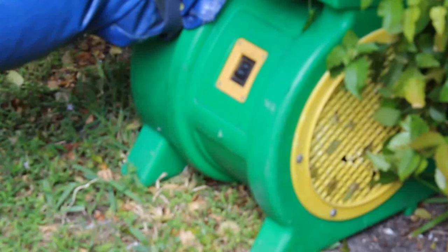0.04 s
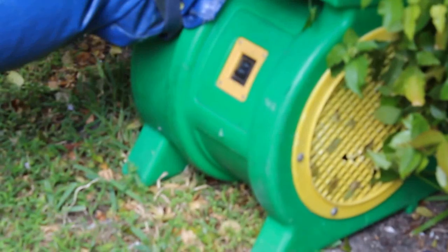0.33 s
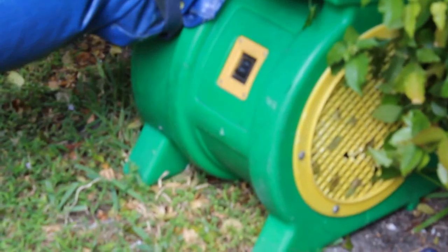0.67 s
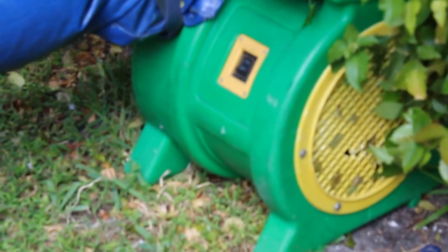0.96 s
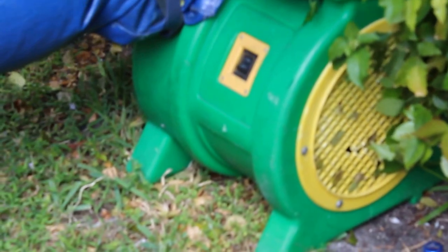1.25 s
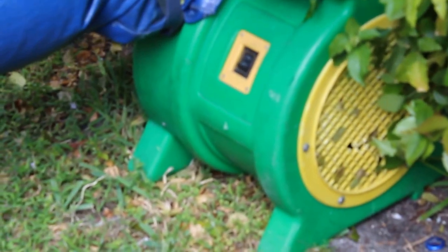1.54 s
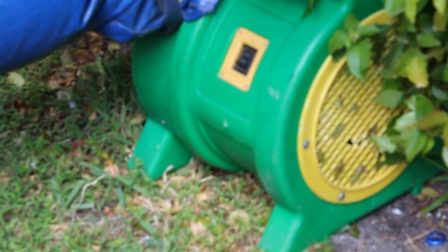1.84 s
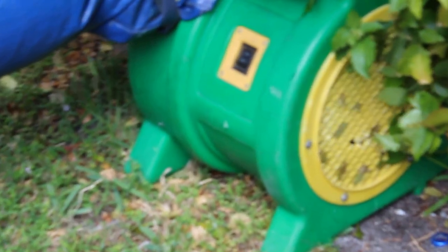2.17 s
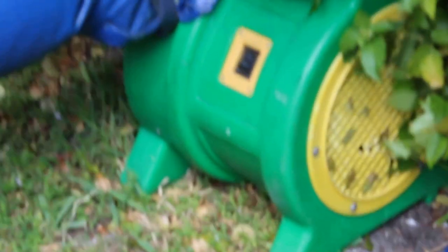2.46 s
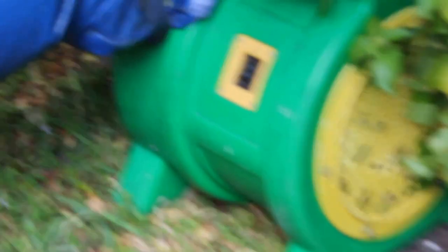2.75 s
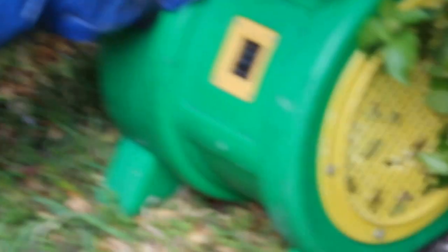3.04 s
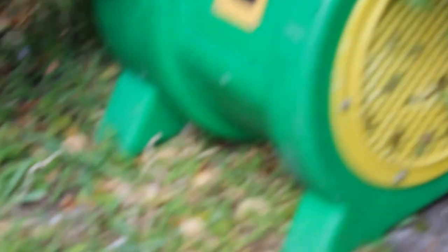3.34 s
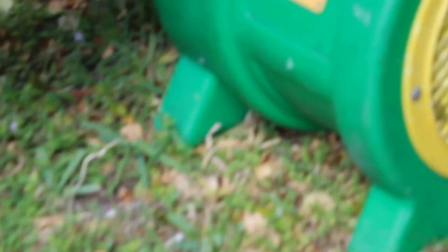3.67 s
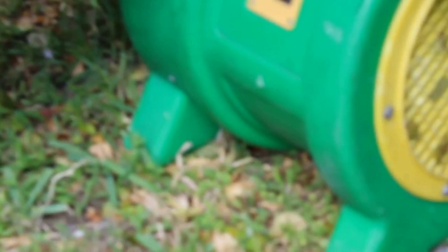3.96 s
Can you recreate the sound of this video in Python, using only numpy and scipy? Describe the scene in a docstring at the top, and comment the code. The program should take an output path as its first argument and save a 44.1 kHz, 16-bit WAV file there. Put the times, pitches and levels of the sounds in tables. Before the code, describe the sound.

An electric blower fan roars steadily up close, with a held whistling note and low hum.

```python
"""A roar of air with one steady note in it cuts in: an electric blower keeping an inflatable up,
on a lawn, close to the microphone. Air rushes through the housing and whistles at the intake grille.
The twelve-blade impeller sings the note; the motor adds a cluster of whining lines and a mains hum.
In the second half the microphone moves, and the balance of the resonances shifts."""
import sys
import numpy as np
from scipy import signal
from scipy.fft import rfft, irfft
from scipy.io import wavfile

SR = 44100
rng = np.random.default_rng(int(sys.argv[2]) if len(sys.argv) > 2 else 0)


def int16_out(signal):
    """Quantize to a 16-bit WAV file."""
    q = np.round(np.clip(np.atleast_2d(signal).T, -1, 1) * 32767)
    wavfile.write(sys.argv[1], SR, q.astype(np.int16))


N = 176400

SHAFT_HZ, BLADES = 56.45, 12
SPEED_WANDER = 0.00027   # share of the shaft speed
TURBULENCE_HZ, FLUTTER_HZ = 19, 22
MOVE_START_S, MOVE_END_S = 2.06, 3.16   # the microphone changes position


def from_db(db):
    """Decibels to gain."""
    return 10 ** (np.asarray(db) / 20)


def rms_one(x):
    """Scale to unit rms."""
    return x / np.sqrt(np.mean(x ** 2) + 1e-20)


def in_time(rows):
    """Rows of (time [s], values...) as one curve per value column, sample by sample."""
    times, *columns = np.transpose(rows)
    return [np.interp(np.arange(N) / SR, times, column) for column in columns]


def bin_hz():
    """Frequencies of the spectrum's bins, no lower than 1 Hz."""
    return np.maximum(np.arange(N // 2 + 1) * SR / N, 1)


def noise(gain):
    """White noise of unit power per Hz, coloured by a gain per bin."""
    return irfft(rfft(rng.standard_normal(N)) * gain, N) * np.sqrt(SR / 2)


def drift(rate_hz):
    """A random wander of rms 1, mostly slower than rate_hz."""
    return rms_one(noise(1 / (1 + (bin_hz() / rate_hz) ** 2)))


def tone(hz, clock, rough, rate_hz):
    """A line of rms 1 that follows the given clock; moving air shakes its level and phase."""
    shaken = 1 + rough * (drift(rate_hz) + 1j * drift(rate_hz))
    cycles = hz * clock + rng.random()
    return rms_one(np.real(shaken * np.exp(2j * np.pi * cycles)))


def motor(clock):
    """Motor and casing whine over the hum of the mains and the shaft."""
    # steady lines of the whine: (frequency [Hz], rms level [dB])
    whine_lines = [(1383.5, -33.8), (1398.3, -38.4), (1439.4, -44.2), (1540.3, -36.5), (1572.6, -41.5),
                   (1603.6, -40.6), (1660.1, -34.6), (1715.9, -43.9), (1746.9, -43.4), (1803.4, -44.3),
                   (1866.0, -44.1), (2090.7, -45.2), (2796.0, -45.7), (2822.2, -45.7), (5255.4, -47.9),
                   (7192.8, -45.1), (7299.8, -46.3)]
    mains_hum_hz = 120
    whine = sum(from_db(db) * tone(hz, clock, rough=0.18, rate_hz=2) for hz, db in whine_lines)
    mains_hum = from_db(-36) * tone(mains_hum_hz, np.arange(N) / SR, rough=0.063, rate_hz=1.5)
    shaft_hum = from_db(-41.5) * tone(4 * SHAFT_HZ, clock, rough=.1, rate_hz=2)
    return whine + mains_hum + shaft_hum


def air_resonances(turbulence, surge_db):
    """Air in the housing and grille booms, rings and whistles, swelling with the flow."""
    # each resonance beams its own way, so the mix depends on where the microphone stands:
    # (frequency [Hz], width [Hz], rms level at the first position [dB], change at the second [dB])
    modes = [(210, 89, -25, -8.5), (402, 60, -40.5, 9.5), (866, 90, -44, 12), (996, 44, -37, -6),
             (1550, 95, -38, 3.5), (2115, 81, -47, 9.5), (2675, 32, -43, 4), (2830, 43, -43, 2),
             (3068, 50, -42, -1), (4460, 75, -43.5, 1), (5240, 53, -43.5, -2), (6060, 81, -40.5, 3),
             (6930, 100, -42, -5), (7170, 89, -34, -2.5), (7316, 74, -37.5, -9), (7710, 80, -39, 0),
             (8230, 100, -44.5, 1.5), (10100, 70, -66, 5), (12830, 150, -72, 0)]
    moved = np.interp(np.arange(N) / SR, (MOVE_START_S, MOVE_END_S), [0, 1])
    bins, out = bin_hz(), 0
    for hz, width, db, change_db in modes:
        ring = rms_one(noise(1 / (1 + (2 * (bins - hz) / width) ** 2)))
        out = out + from_db(db + change_db * moved) * ring
    return out * from_db(surge_db * turbulence)


def air_roar(clock, turbulence):
    """Rushing air in bands that flutter alone and surge together; the hiss throbs with the shaft."""
    # spectrum of the air at close range, before the band gains: (frequency [Hz], density [dB per Hz])
    air_spectrum = [(20,-90),(45,-74.5),(95,-55.5),(130,-48),(170,-44.5),(230,-48.5),(310,-50),(400,-53),(490,-52),(550,-49),(610,-42.5),(720,-51.5),(860,-56.5),(1020,-54),(1130,-54.5),(1240,-60),(1340,-56.5),(1480,-53),(1680,-58.5),(2130,-59),(2400,-60.5),(2880,-59.5),(3020,-66),(3150,-60),(3400,-66.5),(3900,-65),(4250,-67.5),(4950,-65.5),(5500,-64),(6800,-62.5),(7500,-63),(8250,-67),(8550,-71),(9100,-78.5),(10500,-83.5),(11200,-91),(13600,-96),(14400,-103.6),(15000,-121)]
    # bands of the roar: (lower edge [Hz], trim [dB], own flutter [dB], shared surge [dB])
    bands = [(10, 0.5, 0.5, 0), (304.8, -1, 1.4, 0.6), (531.4, -2, 0.44, -0.5), (696, -0.5, 0.6, 0.34),
             (1290, 0.5, -0.4, 0.9), (1912, 0, 1.2, 0), (3300, 0.5, 0.3, .5), (5630, 0, .35, 0.9)]
    # slow swings of the four low bands:
    # (time [s], bass [dB], low middle [dB], housing resonance [dB], middle [dB])
    low_swings = [(0,2.5,-1.8,0.5,0.5),(.55,-1.7,1.2,1.5,0),(.85,-0.5,-0.3,.2,-2),(1.1,-1,-.5,-1.2,1.2),(1.4,2,-2.5,-0.8,-1.5),(2.0,-1.4,-0.7,0.2,-1),(2.5,2.7,-1.5,1,0.5),(2.8,1,3.5,-0.5,-.3),(3.05,-0.5,-1.5,1,1.7),(3.4,-1,-0.5,-2,-0.7),(4,-1,2,0,0)]
    # slow swings of the treble, two bands each: (time [s], rush below 3.3 kHz [dB], hiss above [dB])
    treble_swings = [(0, 1.1, 1.1), (0.23, 0.9, 1.6), (0.5, -0.4, -0.4), (0.68, 0.1, 1.1),
                     (0.85, -1.2, -0.6), (1.02, 0.3, 0.5), (1.24, -1.6, -1.3), (1.43, -0.1, 0.3),
                     (1.56, -1.5, -0.6), (1.76, 0.4, 0.1), (1.98, -1.0, -0.5), (2.17, 1.2, 1.3),
                     (2.3, -0.2, -0.2), (2.63, 1.6, 1.4), (2.8, -1.7, -0.8), (3.3, 0.7, -0.2),
                     (3.65, 0.6, -0.8), (4, -0.5, -0.2)]
    hz = bin_hz()
    air_hz, air_db = np.transpose(air_spectrum)
    colour = from_db(np.interp(np.log(hz), np.log(air_hz), air_db))
    throb = 1 + 0.047 * np.sin(2 * np.pi * SHAFT_HZ * clock)
    rush, hiss = from_db(in_time(treble_swings))
    gains = [*from_db(in_time(low_swings)), rush, rush, hiss * throb, hiss * throb]
    upper_edges = [band[0] for band in bands[1:]] + [SR]
    out = 0
    for (low, trim_db, flutter_db, surge_db), high, gain in zip(bands, upper_edges, gains):
        flutter = from_db(trim_db + flutter_db * drift(FLUTTER_HZ) + surge_db * turbulence)
        out = out + gain * flutter * noise(colour * (hz >= low) * (hz < high))
    return out


def impeller(clock):
    """Blades pass the outlet: one clear note and weak overtones."""
    # the blade-passing note at the microphone: (time [s], rms level [dB])
    note_level = [(0, -25.0), (0.4, -24.9), (0.8, -26.4), (1.85, -25.0), (2.25, -27.0), (2.6, -29.3),
                  (2.85, -25.1), (3.15, -22.1), (4, -23.2)]
    # its overtones: (multiple of the note, rms level [dB])
    overtones = [(2, -47.5), (3, -60)]
    blade_hz = BLADES * SHAFT_HZ
    note = from_db(in_time(note_level)[0]) * tone(blade_hz, clock, rough=0.084, rate_hz=3.6)
    return note + sum(from_db(db) * tone(k * blade_hz, clock, rough=.3, rate_hz=8) for k, db in overtones)


def scene():
    """The running blower from close by in the open air, in mono."""
    clock = np.cumsum(1 + SPEED_WANDER * drift(rate_hz=2.02)) / SR   # seconds, paced by the shaft
    turbulence = drift(TURBULENCE_HZ)
    air = air_roar(clock, turbulence) + air_resonances(turbulence, surge_db=.5)
    return (air + impeller(clock) + motor(clock))[None]


def record(dry):
    """The sound cuts in after an instant of near silence; a steep low-pass takes off the top."""
    start_s, lead_in_db, cutoff_hz = .036, -75, 14900
    gate = np.where(np.arange(N) / SR < start_s, from_db(lead_in_db), 1)
    low_pass = signal.ellip(12, .05, 80, cutoff_hz, fs=SR, output="sos")
    return signal.sosfilt(low_pass, dry * gate)


dry = scene()
out = record(dry)
int16_out(out)
```